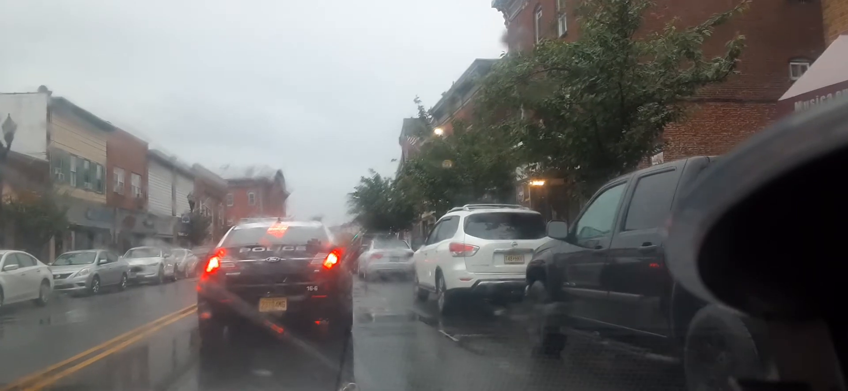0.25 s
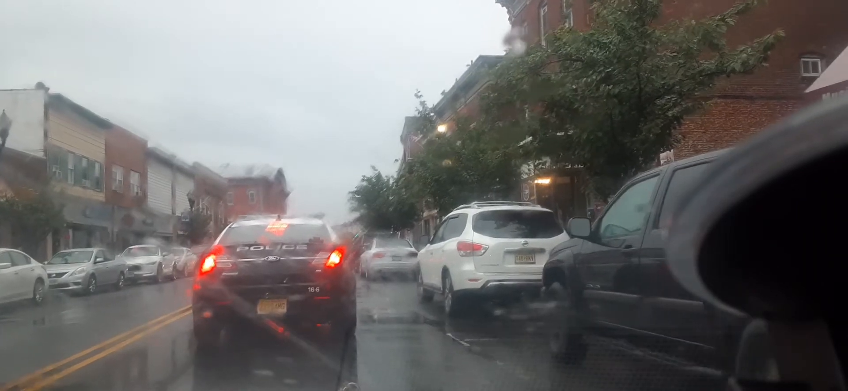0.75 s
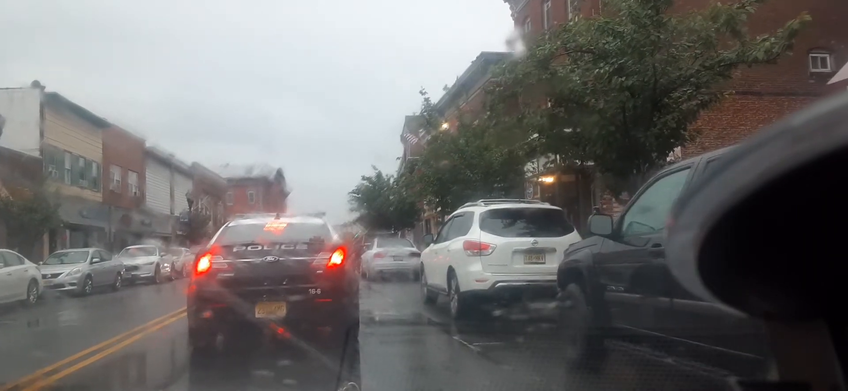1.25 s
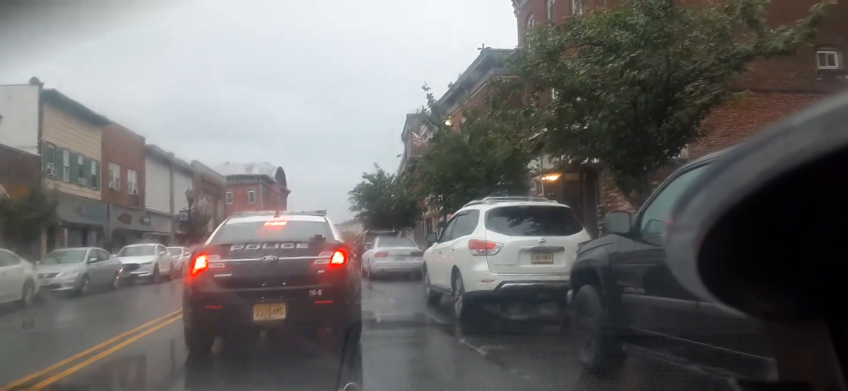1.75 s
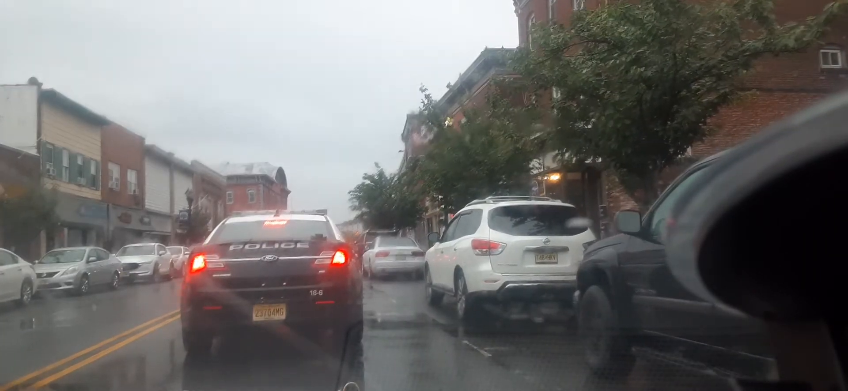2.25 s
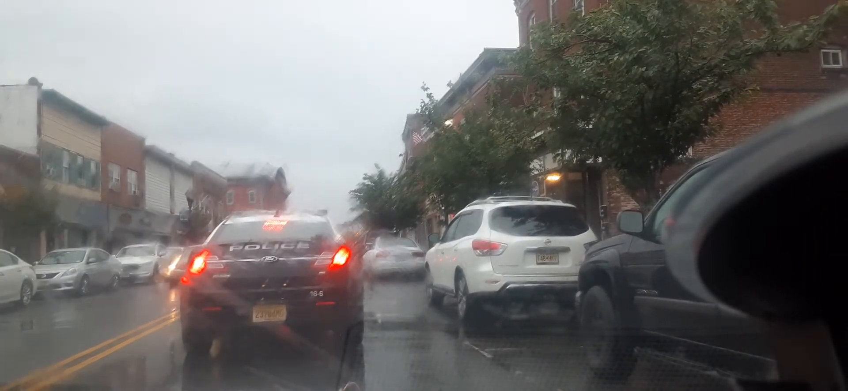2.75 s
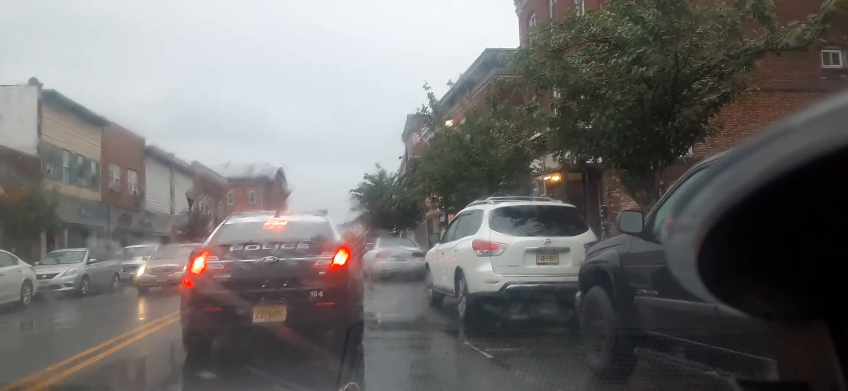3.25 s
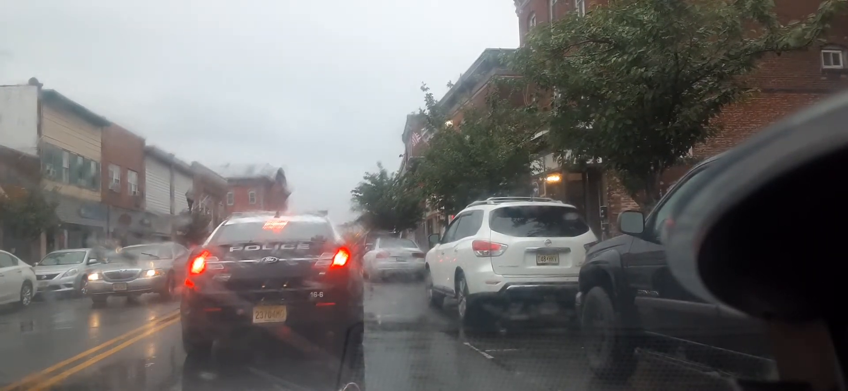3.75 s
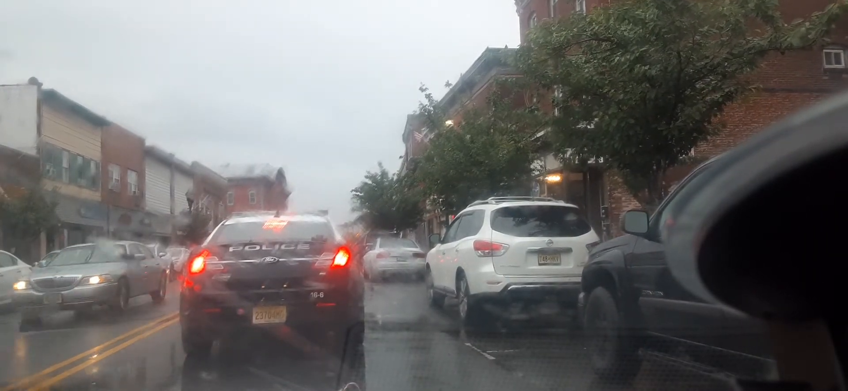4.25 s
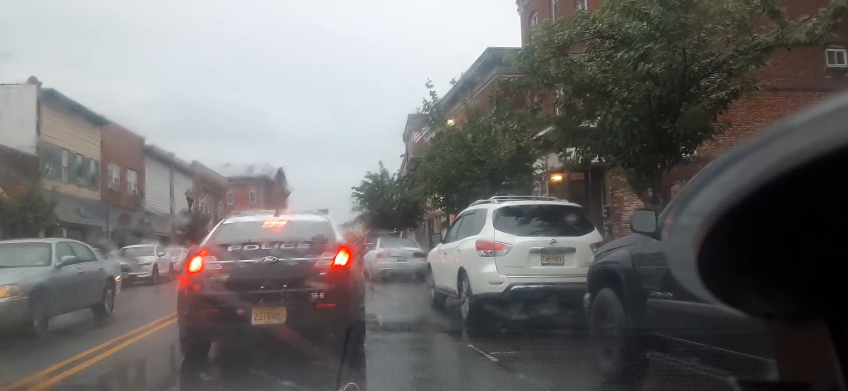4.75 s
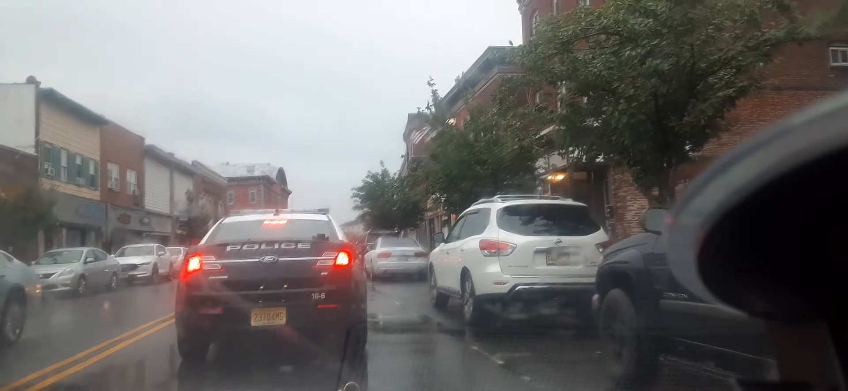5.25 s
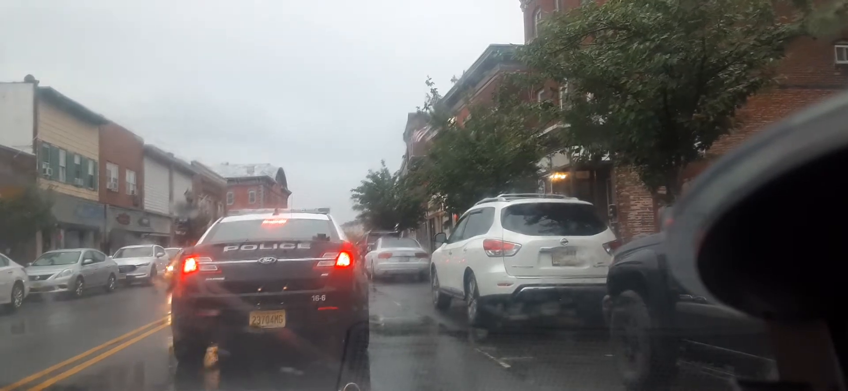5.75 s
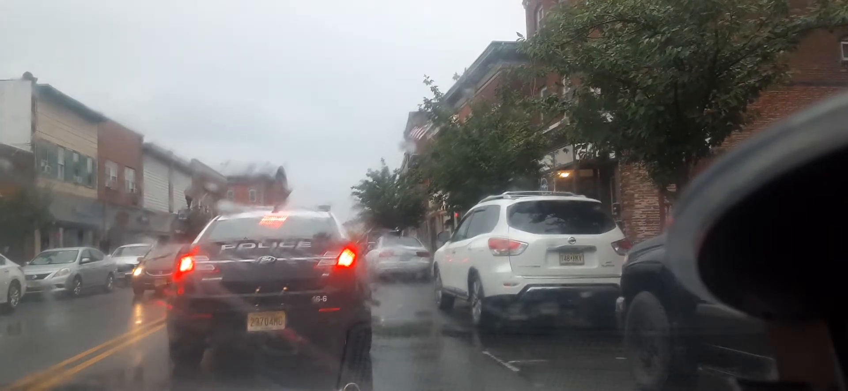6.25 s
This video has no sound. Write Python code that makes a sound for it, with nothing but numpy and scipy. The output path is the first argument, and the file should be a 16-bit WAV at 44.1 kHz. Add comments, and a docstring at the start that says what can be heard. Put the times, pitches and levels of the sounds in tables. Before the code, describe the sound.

Inside a slowly moving car, heard in stereo from the dashboard, a low engine rumble and road drone run throughout while steady rain patters on the windshield and roof, with single drops ticking out sharply. A soft, low hum swells and dips during the first 1.5 seconds. From about 1.5 to 2.2 seconds the wipers cross the glass, louder than the rain, the rubber juddering in a low buzz and scraping, with clicks and dull knocks from the linkage. A few lighter knocks and ticks follow. From 3.5 seconds the engine hum swells gently, peaking near 4.9. The second wiper pass runs from about 4.7 to 5.4 seconds, again shuddering, scraping and knocking. A sharp tick comes at 5.8 seconds. Around 6 seconds the rumble eases and a very faint, thin, high brake squeal enters, lasting under the rain until the end at 6.5 seconds.

```python
"""Inside a car creeping through town in steady rain, stereo microphone at the dashboard.
From the start the engine rumbles and the road drones while drops patter on windscreen and roof;
a narrow hum swells and dips, and ticks and low knocks come now and then. At 1.5 s and again at 4.7 s
the wiper crosses the glass, its rubber juddering and scraping, its linkage knocking. The engine
swells under load into the second pass, and from about 5.9 s a faint brake squeal comes in."""
import sys
import numpy as np
from scipy import signal
from scipy.io import wavfile
from scipy.ndimage import uniform_filter1d

SR = 44100
rng = np.random.default_rng(int(sys.argv[2]) if len(sys.argv) > 2 else 0)


def materialize(psi):
    """Save the field psi as 16-bit PCM at rate SR to the path in sys.argv[1].

    A 1-D psi becomes a single channel; in a 2-D psi each row is a channel.
    """
    bounded = np.clip(np.atleast_2d(psi).T, -1, 1)
    quanta = np.round(bounded * 32767).astype(np.int16)
    wavfile.write(sys.argv[1], SR, quanta)


N = 286650   # 6.5 s


def from_db(db):
    """Decibels to gain."""
    return 10 ** (np.asarray(db) / 20)


def rms_one(x):
    """The signal scaled to rms 1."""
    return x / np.sqrt(np.mean(x ** 2) + 1e-20)


def in_time(rows):
    """Each column after the time column as a curve, one value a sample."""
    times_s, *columns = np.transpose(rows)
    return [np.interp(np.arange(N) / SR, times_s, column) for column in columns]


def at_hz(points, hz):
    """A table read on a log-frequency axis."""
    points_hz, values = np.transpose(points)
    return np.interp(np.log(hz), np.log(np.maximum(points_hz, 1)), values)


def drift(rate_hz):
    """A slow random wander of rms 1."""
    pole = np.exp(-80 * np.pi * rate_hz / SR)   # one step every 40 samples
    slow = signal.lfilter([1], [1, -2 * pole, pole * pole], rng.standard_normal(N // 40 + 2002))[2000:]
    return np.interp(np.arange(N) / 40, np.arange(len(slow)), rms_one(slow))


def ring(drive, hz, t60_s):
    """One resonance: a unit click sets a sine of height 1 ringing."""
    decay, step = from_db(-60 / (t60_s * SR)), 2 * np.pi * hz / SR
    return signal.lfilter([0, np.sin(step)], [1, -2 * decay * np.cos(step), decay * decay], drive + 1e-18)


def bursts(sizes, t60_s):
    """An envelope that jumps at each impact and dies away."""
    return signal.lfilter([1], [1, -from_db(-60 / (t60_s * SR))], sizes + 1e-18)


def pan(left_over_right_db):
    """Left and right gains for a level difference."""
    return from_db(left_over_right_db / 2 * np.array([[1], [-1]]))


def stereo(mid, side, hz):
    """At the microphone, left and right agree in the bass and part in the treble."""
    # likeness of the two channels: frequency_hz, correlation
    likeness = [(60, 0.99), (120, 0.95), (240, 0.93), (480, 0.58), (950, -0.37), (1890, 0.031),
                (3770, -0.19), (7520, 0.078), (15000, -0.093)]
    # lean of the stereo image: frequency_hz, left_over_right_db
    lean = [(60, 2.5), (110, 1), (200, 1), (380, -0.5), (700, -3), (1290, -2.5), (2380, -1), (4400, 2.5),
            (8120, 2.5), (15000, -4)]
    alike = np.clip(at_hz(likeness, hz), -.99, .99)
    apart = np.sqrt(1 - alike) * side * np.array([[1], [-1]])
    return pan(at_hz(lean, hz)) * (np.sqrt(1 + alike) * mid + apart)


def banded_noise(spectrum, envelope, flicker_db, flicker_hz):
    """Third-octave bands of stereo noise under one envelope, each flickering on its own; mid rms 1."""
    lowest_hz, highest_hz = spectrum[0][0], spectrum[-1][0]
    edges = lowest_hz * 2 ** np.arange(0, np.log2(highest_hz / lowest_hz) + 1 / 3, 1 / 3)
    edges = edges[edges < .45 * SR]
    white = envelope * rng.standard_normal((2, 2, N))
    out = 0
    for k, (low, high) in enumerate(zip(edges, edges[1:])):
        hz = np.sqrt(low * high)
        band_db = at_hz(spectrum, hz)
        if band_db < -40:
            continue
        band = signal.butter(2, [low, high], "band", fs=SR, output="sos")
        mid, side = signal.sosfilt(band, white[k % 2])
        out = out + from_db(band_db + flicker_db * drift(flicker_hz)) * stereo(mid, side, hz)
    return out / np.sqrt(np.mean(out.mean(axis=0) ** 2))


def rumble(boom_db, drone_db):
    """Engine boom and road drone fill the cabin: two low noises that throb together."""
    # engine boom spectrum: frequency_hz, relative_db
    boom_spectrum = [(21, -29), (36, -3), (59, -2), (91, 6), (107, -0.5), (126, -5.5), (140, -9),
                     (180, -44), (310, -120)]
    # road drone spectrum: frequency_hz, relative_db
    drone_spectrum = [(82, -36), (140, 0.5), (220, -2), (253, 4), (291, -7.5), (317, -11), (370, -7),
                      (443, -16.5), (483, -15), (560, -15.5), (707, -13.5), (900, -33.5), (1170, -63),
                      (1980, -120)]
    throb = from_db(0.83 * drift(3.5))
    boom = from_db(boom_db) * banded_noise(boom_spectrum, throb, flicker_db=5.0, flicker_hz=3.9)
    drone = from_db(drone_db) * banded_noise(drone_spectrum, throb, flicker_db=1.0, flicker_hz=15.0)
    return boom + drone


def engine_idle(turn_hz=23.5):
    """The idling engine hums at multiples of its turning rate, each wavering a little."""
    # engine orders: multiple, level_db
    orders = [(2, -50), (3, -56), (4, -50), (5, -48.5), (6, -56), (7, -52.5)]
    turn = 2 * np.pi * np.cumsum(turn_hz * (1 + .004 * drift(1.5))) / SR
    tones = 0
    for order, db in orders:
        height = np.sqrt(2) * from_db(db + 2.5 * drift(2.6))
        tones = tones + height * np.sin(order * turn + rng.uniform(0, 2 * np.pi))
    return stereo(tones, 0, hz=100)


def roof_hum(fade_db_per_s=60):
    """Road noise rings one mode of a roof panel; the hum swells and dips by chance, fading after 1.5 s."""
    # random swells and dips of a narrow 250 Hz hum: time_s, level_db
    swells = [(0.0, -55), (0.492, -43), (0.852, -51), (1.102, -39), (1.39, -56), (1.5, -42.5)]
    fading_s = np.maximum(0, np.arange(N) / SR - swells[-1][0])
    hum = rms_one(ring(rng.standard_normal(N), hz=253.5, t60_s=0.076))
    return stereo(from_db(in_time(swells)[0] - fade_db_per_s * fading_s) * hum, 0, hz=150)


def drops(spectrum, patter_db, landings, accent_s, accent_db, t60_s):
    """Small drops of uneven size and longer-lasting timed accents, as bursts of noise in one colour."""
    size_db = np.minimum(rng.exponential(1, N), 4)
    patter = from_db(patter_db) * rms_one(bursts(landings * from_db(size_db), t60_s))
    accents = np.zeros(N)
    accents[np.round(accent_s * SR).astype(int)] = from_db(accent_db)
    envelope = patter + bursts(accents, 2.7 * t60_s)
    envelope = uniform_filter1d(envelope, size=41, origin=20)   # a drop lands within a millisecond
    level = np.sqrt(np.mean(envelope ** 2))
    return level * banded_noise(spectrum, envelope, flicker_db=0.7, flicker_hz=16.0)


def rain(rain_db, drops_per_s=250.0):
    """Far drops merge into a wash and fine spray; each near one thuds on a panel and ticks as it splashes."""
    # wash of far drops: frequency_hz, relative_db
    wash_spectrum = [(290, -22), (500, -4), (564, 4), (645, -15.5), (984, 0), (1170, -7), (1470, -9.5),
                     (1780, -10.5), (2350, -3.5), (3500, -11), (4000, -13), (7690, -24), (9000, -28.5),
                     (11700, -67), (19800, -120)]
    # fine spray: frequency_hz, relative_db
    spray_spectrum = [(5290, -30), (9000, -8), (9750, -25), (12000, 10), (15100, 5), (15500, -2)]
    # panel under a drop: frequency_hz, relative_db
    thud_spectrum = [(300, -20), (800, 3), (1400, 0), (2400, 0.5), (3600, -4), (4500, -24.5)]
    # splash of a drop: frequency_hz, relative_db
    tick_spectrum = [(3000, 2.5), (4000, 0.5), (7000, -9.5), (9300, -15), (12000, -19), (15800, -21.5)]
    # the loudest drops, plus sharp wiper ticks during the passes: start_s, tick_db, thud_db
    accents = [(0.0188, -49.5, -55), (0.1426, -44, -42), (0.164, -48.5, -43), (0.2074, -50, -53),
               (0.3055, -47.5, -45), (0.338, -44, -55.5), (0.4847, -46, -49.5), (0.517, -52, -52),
               (0.638, -47, -53.5), (0.7043, -53, -50.5), (0.732, -49.5, -50), (0.862, -48.5, -50),
               (0.914, -47.5, -61), (0.938, -45, -51), (0.9996, -46, -50.5), (0.9542, -49, -53),
               (1.0502, -48.5, -52), (1.065, -44.5, -45.5), (1.0878, -42, -45), (1.122, -47, -54),
               (1.2725, -50, -48), (1.2865, -46, -49), (1.4167, -39, -32.5), (1.451, -53.5, -52),
               (1.7633, -48, -55), (2.234, -49, -50), (2.564, -50, -44.5), (2.7636, -47.5, -44),
               (2.7845, -48.5, -46.5), (2.828, -48, -45), (3.072, -51, -52), (3.222, -50, -47.5),
               (3.473, -53, -43.5), (3.548, -54, -46), (3.671, -50, -46), (3.7997, -48, -48),
               (4.252, -46, -47), (4.4935, -50.5, -44.5), (5.0284, -46, -44.5), (5.1179, -50.5, -49),
               (5.227, -46, -42), (5.6775, -51, -45), (5.7003, -45.5, -45.5), (5.7324, -48, -58),
               (5.8015, -33, -50), (5.851, -53, -53.5), (6.037, -54, -48.5), (6.1951, -50, -53),
               (6.3433, -47, -44)]
    flutter = from_db(0.98 * drift(38))
    wash = from_db(rain_db) * banded_noise(wash_spectrum, flutter, flicker_db=0.6, flicker_hz=7.5)
    spray_db = -69 + 0.96 * (rain_db - rain_db.mean())
    spray = from_db(spray_db) * banded_noise(spray_spectrum, 1, flicker_db=2.5, flicker_hz=6.0)
    landings = rng.random(N) < drops_per_s * from_db(3.5 * drift(14)) / SR   # drops come in clusters
    accent_s, tick_db, thud_db = np.transpose(accents)
    thuds = drops(thud_spectrum, rain_db - 2.5, landings, accent_s, thud_db, t60_s=0.018)
    ticks = drops(tick_spectrum, rain_db - 9.0, landings, accent_s, tick_db, t60_s=0.011)
    return wash + spray + thuds + ticks


def crack(starts, strike_db, pitch_hz, boost_db=7.5, t60_s=0.035, reach_octaves=0.22):
    """Each trim tick opens with a burst of noise round its pitch, unrelated left and right."""
    out, t = np.zeros((2, N + SR)), np.arange(SR // 10) / SR
    for start, db, hz in zip(starts, strike_db, pitch_hz):
        noise = from_db(db + boost_db - 60 * t / t60_s) * rng.standard_normal((2, len(t)))
        edges_hz = hz * 2 ** np.array([-reach_octaves, reach_octaves])
        band = signal.butter(1, edges_hz, "band", fs=SR, output="sos")
        out[:, start:start + len(t)] += signal.sosfilt(band, noise)
    return out[:, :N]


def trim_ticks(focus_db_per_octave=9.0):
    """Wiper arm and trim tick; each strike rings the modes near its own pitch hardest."""
    # hard strikes: start_s, strike_db, left_over_right_db, pitch_hz
    strikes = [(0.069, -41, -1, 2950), (1.286, -51, -7, 2240), (1.418, -42, 2, 926),
               (1.541, -24, -0.5, 1120), (1.594, -30.5, 8, 2600), (1.638, -40, -9, 2460),
               (1.652, -29.5, 2, 2000), (1.97, -32.5, -4.0, 1000), (2.004, -29.5, 17, 1010),
               (2.007, -27.5, 0, 2000), (2.036, -23.5, 8, 3060), (2.101, -33, -4, 2094),
               (2.14, -38, -13, 900), (2.370, -33, -16.5, 2540), (2.482, -37, -10, 1160),
               (3.546, -40, -12, 2120), (4.252, -44, 0, 958), (4.818, -25.5, -6.5, 1150),
               (4.857, -32.5, -2.5, 1411), (4.894, -39, 8, 1300), (4.925, -25.5, -11, 1500),
               (4.939, -26.5, -5, 900), (4.988, -33, 5.5, 2400), (5.272, -23, 2, 792),
               (5.289, -28.5, 9, 2503), (5.376, -35.5, -2, 2572), (5.413, -36.5, 11, 930),
               (5.801, -22, 11, 1720), (6.196, -42, -0.5, 2650)]
    # modes of the trim: pitch_hz, gain_db, t60_s
    modes = [(517, 6, 0.065), (930, 1, 0.041), (1160, -3, 0.044), (1780, -2.5, 0.028), (2217, -7, 0.042),
             (2570, -2, 0.04), (3380, -12.5, 0.06), (4100, -2.5, 0.011), (4120, -9.5, 0.063),
             (5800, -35, .012), (7470, -38, .01)]
    start_s, strike_db, pan_db, pitch_hz = np.transpose(strikes)
    starts = np.round(start_s * SR).astype(int)
    out = crack(starts, strike_db, pitch_hz)
    chance = rng.standard_normal((len(starts), len(modes), 2))
    for k, (hz, db, t60_s) in enumerate(modes):
        off_pitch_db = focus_db_per_octave * abs(np.log2(hz / pitch_hz))
        mid = (-1) ** k * from_db(strike_db + db - off_pitch_db + 0.3 * chance[:, k, 0])
        side = .4 * mid * np.sign(chance[:, k, 1])
        clicks = np.zeros((2, N))
        clicks[:, starts] = stereo(mid, side, hz) * pan(pan_db)
        out = out + ring(clicks, hz, t60_s)
    return out


def knocks(swell_s=0.0029, tone_t60_s=0.1, shove_t60_s=0.099):
    """Short low pulses: each gives the envelope of a shove on the glass, and a dying panel tone."""
    # low knocks, plus two brief swells of the roof panel's hum near 1.1 s:
    # start_s, tone_db, pitch_hz, shove_db
    pulses = [(1.049, -26.5, 240, -82), (1.134, -28, 254, -43), (1.58, -22, 173, -29),
              (1.689, -8.5, 109, -36), (1.981, -29, 160, -28), (2.018, -15, 188, -25),
              (2.045, -5.5, 111.4, -50), (2.16, -22, 102, -43), (2.377, -24, 108, -46),
              (2.456, -23.5, 90.5, -52), (2.603, -22, 146, -36.5), (2.65, -23, 98, -41),
              (2.757, -27, 163, -36), (3.349, -25, 220, -35), (4.775, -19, 223.6, -44.5),
              (4.898, -8, 99.2, -33), (5.287, -10.5, 148, -37), (5.369, -23.5, 174.4, -36),
              (5.418, -26, 173, -32), (5.803, -30, 97.5, -29.5), (6.031, -30, 118, -38.5)]
    shove, tone = np.zeros((2, N))
    for start_s, tone_db, hz, shove_db in pulses:
        start = round(start_s * SR)
        t = np.arange(min(N - start, SR // 4)) / SR
        span = slice(start, start + len(t))
        swell = (1 - np.exp(-t / swell_s)) ** 2
        tone[span] += swell * from_db(tone_db - 60 * t / tone_t60_s) * np.sin(2 * np.pi * hz * t)
        shove[span] += swell * from_db(shove_db - 60 * t / shove_t60_s)
    return shove, tone


def windscreen(mid_side, modes):
    """The glass rings in parallel modes, each scaled to pass white noise at its listed gain."""
    out = 0
    for k, (hz, width_hz, db) in enumerate(modes):
        t60_s = np.log(1000) / (np.pi * width_hz)
        mid, side = ring(mid_side, hz, t60_s) * np.sqrt(4 * np.pi * width_hz / SR)
        out = out + (-1) ** k * from_db(db) * stereo(mid, side, hz)
    return out


def blade_motion():
    """The blade's pitch and levels, eased over 5 ms, and a gate that is shut while it is parked."""
    # wiper strokes, the first two joined in one pass: time_s, judder_hz, judder_db, rub_db
    strokes = [
        [(1.52, 168, -49, -67), (1.548, 168.6, -45, -34), (1.565, 168, -44, -38.5), (1.592, 163.7, -30, -29.5),
         (1.662, 112.4, -31, -29), (1.695, 112.9, -48, -37.5), (1.728, 114.2, -26.5, -56),
         (1.864, 109.6, -27, -47.5), (1.95, 109.1, -54, -50)],
        [(1.95, 163, -37, -56), (1.984, 155.5, -31, -35), (2.012, 142.3, -14, -25), (2.03, 140, -29, -27),
         (2.06, 119.7, -29, -40), (2.122, 113.5, -48, -45.5), (2.172, 102.8, -31, -46), (2.25, 98, -57, -76)],
        [(4.74, 170.3, -52, -71), (4.805, 165.2, -40.5, -57.5), (4.816, 168.3, -39, -41),
         (4.88, 169.3, -42, -33.5), (4.924, 165.8, -32.5, -27), (4.98, 164, -19.5, -28.5),
         (5.015, 166.8, -28.5, -33.5), (5.035, 169.5, -23, -32), (5.126, 171.5, -20.5, -30),
         (5.164, 172.6, -20, -34.5), (5.258, 170.4, -24, -32.5), (5.292, 159, -22, -27.5),
         (5.318, 146.5, -29, -52.5), (5.36, 157, -40, -46)],
    ]
    t = np.arange(N) / SR
    moving = np.any([(t >= stroke[0][0]) & (t <= stroke[-1][0]) for stroke in strokes], axis=0)
    gate = uniform_filter1d(moving * 1., size=400)
    rows = sorted(row for stroke in strokes for row in stroke)
    return uniform_filter1d([*in_time(rows), gate], size=220)


def wiper():
    """The rubber sticks and slips once a cycle and hisses; its grit and the knocks shake the glass."""
    # windscreen modes: pitch_hz, width_hz, gain_db
    modes = [(91, 22, -12.5), (186.4, 54, 3), (258, 17.4, 0.5), (296.8, 24, -2), (368.6, 50, -0.5),
             (452, 39, -10), (484, 45, -1.5), (602, 46, -8.5), (704, 49, -6.5), (864, 58, -12),
             (1040, 120, -18)]
    # extra rub on the upper modes: time_s, boost_db
    upper_boost = [(1.55, -4.5), (1.6, 4), (1.67, -4.5), (1.98, 4), (2.012, 7), (2.04, -1), (4.9, 1),
                   (5.13, 3), (5.25, 8), (5.3, -1.5)]
    # hiss of rubber on glass: frequency_hz, relative_db
    hiss_spectrum = [(590, -23), (1000, 2), (1580, -3), (1790, -2.5), (2420, 0), (4190, -12), (4700, -12),
                     (5340, -18.5), (7530, -35), (9040, -53), (12000, -36.5), (15500, -41)]
    judder_hz, judder_db, rub_db, gate = blade_motion()
    phase = 2 * np.pi * np.cumsum(judder_hz * (1 + .025 * drift(30))) / SR
    # the half-rate term makes every other slip stronger
    tone = np.sqrt(2) * (np.sin(phase) + 0.33 * np.sin(phase / 2) + 0.22 * np.sin(2 * phase))
    judder = gate * from_db(judder_db + 3.6 * drift(30)) * tone
    slip = (1 + .5 * np.cos(phase)) * from_db(1.3 * drift(45))
    shove, knock_tone = knocks()
    grit = rng.standard_normal((2, N))
    lower_drive = gate * slip * from_db(rub_db) + shove
    upper_drive = gate * slip * from_db(rub_db + in_time(upper_boost)[0]) + shove
    rub = windscreen(lower_drive * grit, modes[:5]) + windscreen(upper_drive * grit, modes[5:])
    rub = signal.sosfilt(signal.butter(2, 1300, fs=SR, output="sos"), rub)
    hiss = from_db(rub_db - 9.5) * banded_noise(hiss_spectrum, slip, flicker_db=1.5, flicker_hz=18.0)
    low_cut = signal.butter(4, 70, "high", fs=SR, output="sos")   # the panel radiates no deeper
    low = signal.sosfilt(low_cut, judder + knock_tone)
    return stereo(low, 0.6 * np.roll(low, 70), hz=150) + rub + gate * hiss


def engine_swell(fade_db_per_s=150):
    """The engine's third order swells under load from 3.5 to 4.9 s, fading quickly either side."""
    # third order: time_s, pitch_hz, level_db
    load = [(3.52, 70.4, -45), (4.088, 70.3, -46), (4.182, 71.2, -44), (4.864, 71.03, -36),
            (4.88, 71.5, -29)]
    t = np.arange(N) / SR
    hz, level_db = in_time(load)
    outside_s = np.maximum(0, np.maximum(load[0][0] - t, t - load[-1][0]))
    height = np.sqrt(2) * from_db(level_db - fade_db_per_s * outside_s + 0.88 * drift(6.9))
    return stereo(height * np.sin(2 * np.pi * np.cumsum(hz) / SR), 0, hz=150)


def brake_squeal(lower_hz=2810, upper_hz=6100):
    """The brake sings in two thin wavering tones that rise out of the cabin noise at the end."""
    # squeal levels: time_s, lower_tone_db, upper_tone_db
    levels = [(5.9, -80, -95), (6.0, -67, -95), (6.38, -68, -90), (6.43, -68, -70), (6.5, -68, -70)]
    out = 0
    for db, hz in zip(in_time(levels), (lower_hz, upper_hz)):
        height = from_db(db + 1.5 * drift(15))
        phase = 2 * np.pi * np.cumsum(hz * (1 + 0.004 * drift(38.0))) / SR
        out = out + height * np.sin(phase)
    return out


def scene():
    """Everything as heard at the dashboard."""
    # running levels in the cabin: time_s, engine_boom_db, road_drone_db, rain_db
    cabin = [(0.0, -37.5, -39.5, -54.5), (0.3, -40.5, -41.5, -52.5), (0.86, -45, -40.5, -53.5),
             (1.1, -42, -42.5, -50), (1.4, -45, -37.5, -48.5), (2.3, -39, -38, -53),
             (2.55, -35.5, -38.5, -53), (2.82, -44, -43, -55), (3.3, -39.5, -42.5, -55),
             (3.52, -38, -40, -51.5), (4.2, -40.5, -39.5, -52.5), (4.7, -36.5, -39.5, -52),
             (5.45, -41, -39.5, -51.5), (5.87, -34.5, -39.5, -54.5), (6.07, -52, -41, -56.5),
             (6.3, -51, -46.5, -51.5), (6.5, -41, -41, -53.5)]
    boom_db, drone_db, rain_db = in_time(cabin)
    car = rumble(boom_db, drone_db) + engine_swell() + roof_hum() + engine_idle()
    return car + rain(rain_db) + wiper() + trim_ticks() + brake_squeal()


def record(dry):
    """The microphone loses the deep bass and the top; its port has a dip near 9 kHz."""
    low_cut = signal.cheby2(10, 35, 36, "high", fs=SR, output="sos")
    port_notch = signal.butter(1, [8200, 10200], "bandstop", fs=SR, output="sos")
    high_cut = signal.ellip(12, .5, 70, 15770, fs=SR, output="sos")
    trimmed = signal.sosfilt(low_cut, dry)
    dipped = 0.5 * signal.sosfilt(port_notch, trimmed) + 0.41 * trimmed
    return signal.sosfilt(high_cut, dipped)


dry = scene()
out = record(dry)
materialize(out)
```